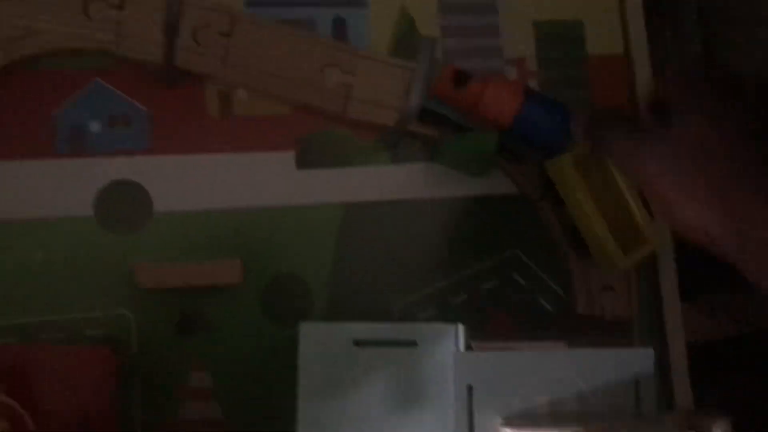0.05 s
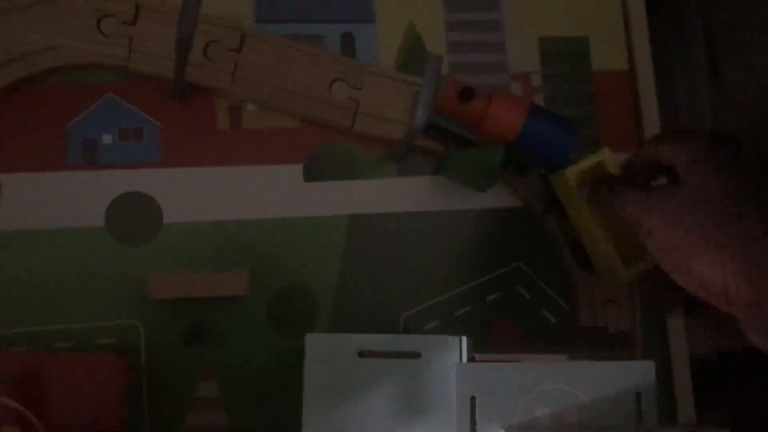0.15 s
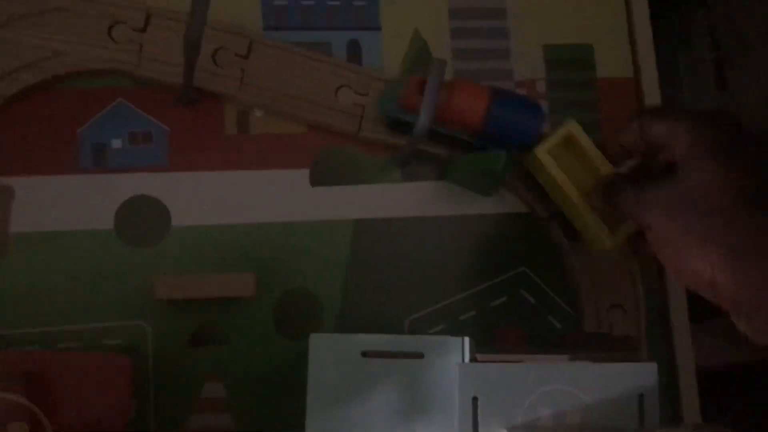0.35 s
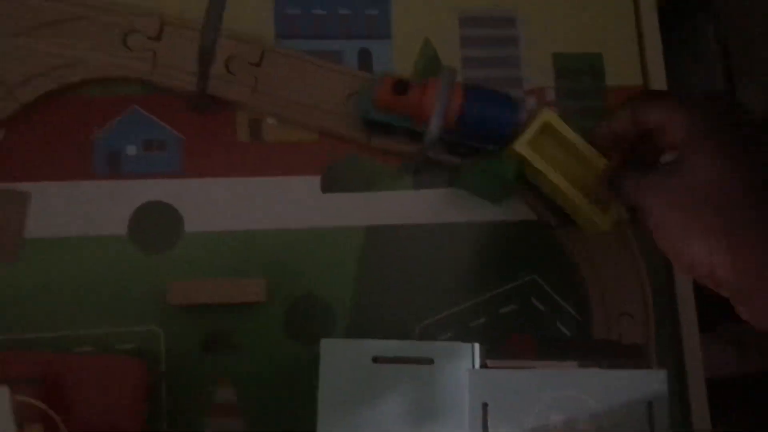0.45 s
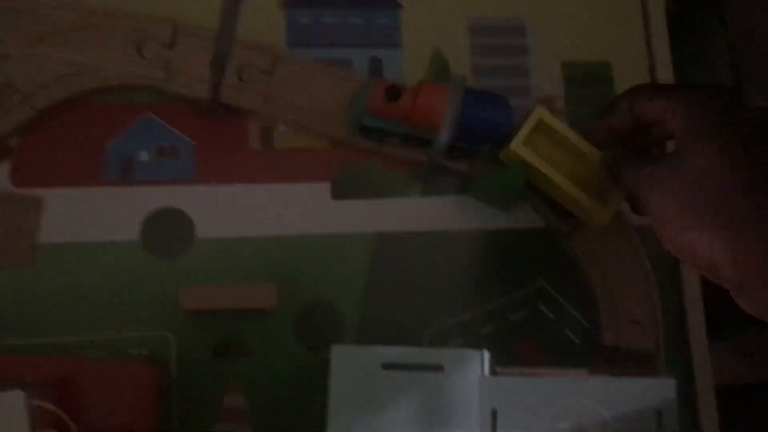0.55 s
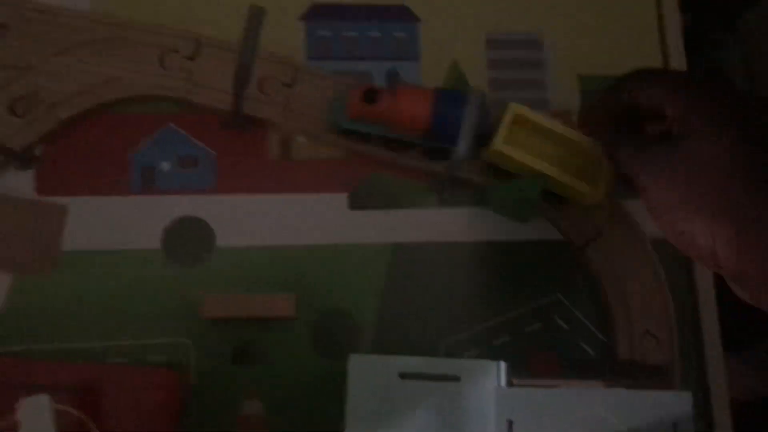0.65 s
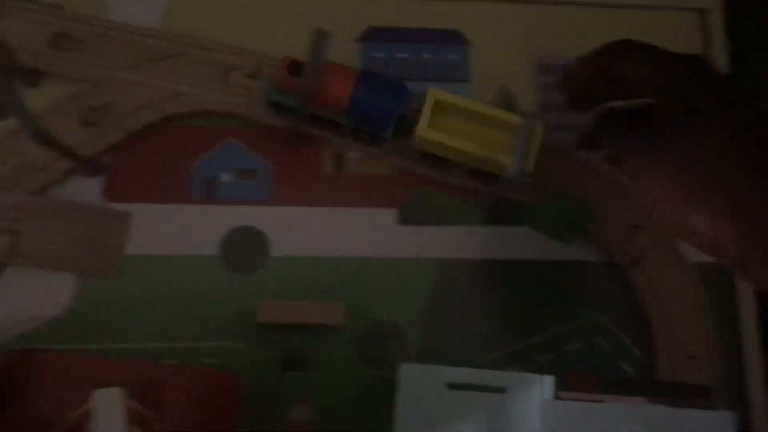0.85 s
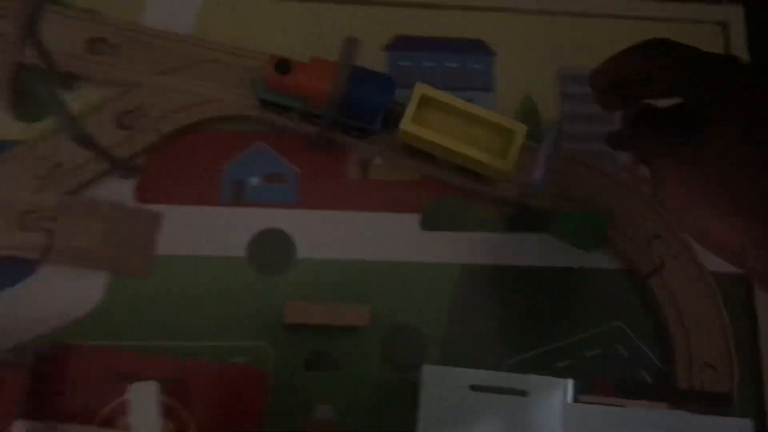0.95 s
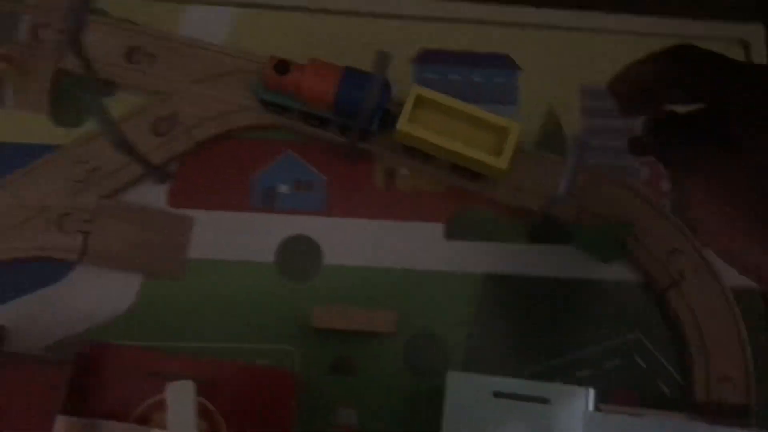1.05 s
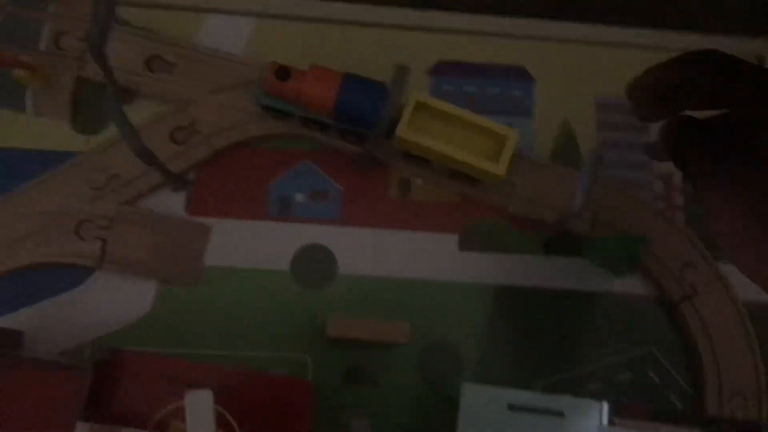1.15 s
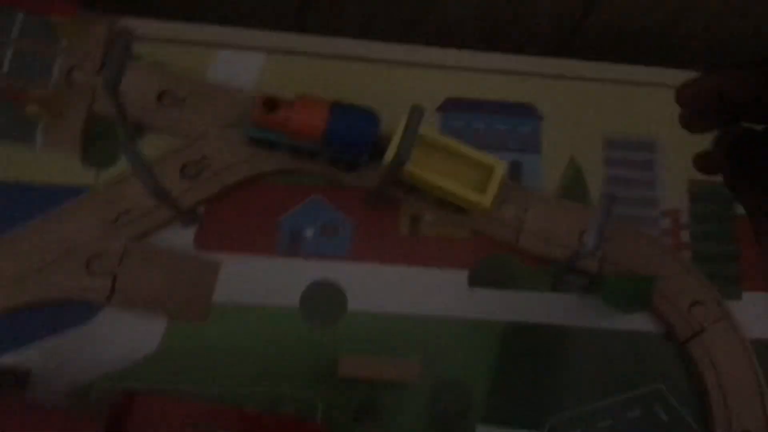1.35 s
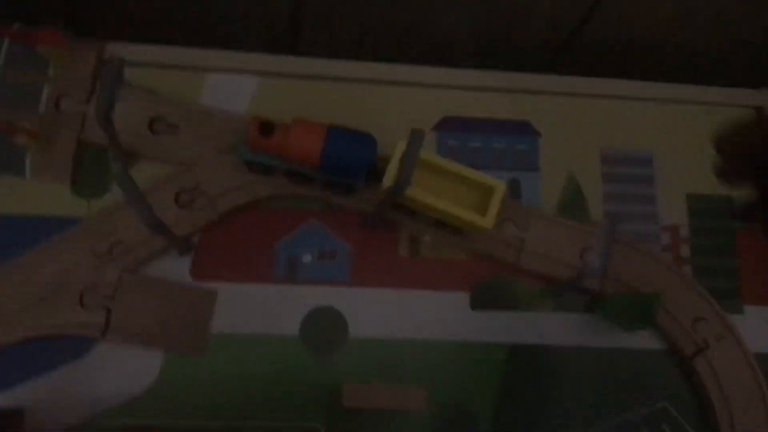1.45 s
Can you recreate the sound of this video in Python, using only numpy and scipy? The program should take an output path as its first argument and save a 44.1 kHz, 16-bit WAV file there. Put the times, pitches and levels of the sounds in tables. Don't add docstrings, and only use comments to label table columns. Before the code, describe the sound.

Toy train pushed over wooden track joints, sharp clicks and knocks above a low hollow table rumble

```python
import sys
import numpy as np
from scipy import signal
from scipy.fft import rfft, irfft
from scipy.io import wavfile
from scipy.ndimage import uniform_filter1d

SR = 44100
rng = np.random.default_rng(int(sys.argv[2]) if len(sys.argv) > 2 else 0)


def attenuation_scalar(level_db):
    decades = np.asarray(level_db, float) / 20
    return 10 ** decades


def persist_wave(psi):
    counts = np.round(np.clip(psi, -1, 1) * 32767).astype(np.int16)
    wavfile.write(sys.argv[1], SR, np.atleast_2d(counts).T)


N = 66150


def level(x, db):
    return x * attenuation_scalar(db) / np.sqrt(np.mean(x ** 2))


def add(out, start_s, x):
    i = int(start_s * SR)
    out[i:i + len(x)] += x[:N - i]


def cut(x, hz, kind, order):
    return signal.sosfilt(signal.butter(order, hz, kind, fs=SR, output="sos"), x)


def ring(modes, chance=0, push=None):
    hz, db, t60_s = np.array(modes, float).T[:, :, None]
    detune, scatter = np.zeros((2, len(modes), 1)) + chance
    t = np.arange(int(min(np.max(t60_s), 0.2) * SR)) / SR
    mode_hz = np.minimum(hz * (1 + 0.037 * detune), 16000)
    waves = np.sin(2 * np.pi * mode_hz * t) * attenuation_scalar(-60 * t / t60_s)
    if push is not None:
        driven = signal.fftconvolve(waves, push[None], axes=1)
        gain = np.sqrt(np.sum(waves ** 2, axis=1) / np.sum(driven ** 2, axis=1))
        rank = np.argsort(np.argsort(hz, axis=0), axis=0)
        waves = driven * gain[:, None] * (-1) ** rank
    return np.sum(attenuation_scalar(db + 2.5 * scatter) * waves, axis=0)


def near(modes, pitch_hz, db_oct, t60_s):
    struck = []
    for hz, db, mode_t60_s in modes:
        octaves = abs(np.log2(hz / pitch_hz))
        if octaves > 0.09:
            struck.append((hz, db - db_oct * octaves, mode_t60_s))
    return struck + [(pitch_hz, 3.5, t60_s)]


def hit(peak_db, modes, chatter_ms, chance):
    t = np.arange(2500) / SR
    chatter = np.exp(-2 * t / (chatter_ms * 1e-3))
    loose_parts = attenuation_scalar(-40) * np.exp(-t / 0.0058)
    push = chance[:2500] * np.minimum(t / 0.00046, 1) * (chatter + loose_parts)
    push[4] += 0.74 * np.sqrt(np.sum(push ** 2))
    spread = chance[2500:2500 + 2 * len(modes)].reshape(2, -1, 1).copy()
    spread[:, -1] = 0
    x = cut(ring(modes, spread, push), min(1.55 * modes[-1][0], 20000), "low", order=2)
    return x * attenuation_scalar(peak_db) / np.max(np.abs(x))


def grains(per_s, spread_db, modes):
    happens, size, side = rng.random((3, N))
    size_db = spread_db * np.minimum(-np.log(1 - size), 3.2)
    bumps = (happens < per_s / SR) * attenuation_scalar(size_db) * np.sign(side - 0.5)
    return level(signal.fftconvolve(bumps, ring(modes))[:N], 0)


def patches(db):
    hold = int(SR / 90)
    rough = np.clip(rng.standard_normal(400), -2, 2)
    return db * uniform_filter1d(np.repeat(rough, hold)[:N], size=hold // 2)


# pitch_hz [Hz], level_db [dB per Hz]
AIR_SPECTRUM = [(26, -38), (45, 2), (109, -9.5), (306, -31), (488, -20.5), (2240, -35.5), (2730, -35.5),
                (3080, -36), (16000, -39.5)]


def air():
    hz = np.arange(N // 2 + 1) * SR / N + 1
    pitch_hz, level_db = np.array(AIR_SPECTRUM).T
    hiss_db = np.interp(np.log(hz), np.log(pitch_hz), level_db)
    hiss = irfft(rfft(rng.standard_normal(N)) * attenuation_scalar(hiss_db), N)
    rub_shape = np.exp(-(np.log(hz / 11000) / 3.6) ** 2)
    rub = irfft(rfft(rng.standard_normal(N)) * rub_shape, N)
    passing = np.exp(-((np.arange(N) / SR - 1.188) / 0.078) ** 2)
    return level(hiss, -59) + level(rub, -60.5) * passing


def room(dry):
    t60_s, tail_db, rise_s = 0.14, -16.5, 0.0054
    t = np.arange(SR // 2) / SR
    tail = rng.standard_normal(len(t)) * attenuation_scalar(-60 * t / t60_s) * np.minimum(t / rise_s, 1)
    tail = cut(tail, [600, 11000], "band", order=1)
    return attenuation_scalar(tail_db) * signal.fftconvolve(dry, tail / np.sqrt(np.sum(tail ** 2)))[:N]


# start_s [s], level_db [dB], pitch_hz [Hz], t60_s [s]
PIN_RINGS = [
    (.8625, -44, 15000, .09),
    (.838, -48, 6700, .05),
    (1.195, -66, 5600, .2),
    (.964, -46, 3150, .04),
]


def pins():
    out = np.zeros(N)
    for start_s, level_db, pitch_hz, t60_s in PIN_RINGS:
        add(out, start_s, ring([(pitch_hz, level_db, t60_s)]))
    return out


# pitch_hz [Hz], level_db [dB], t60_s [s]
COUPLER_MODES = [(3600, -12, .005), (4300, -5, .006), (5200, -2, .006), (6100, 0, .007), (7200, -6, .005),
                 (8500, -2, .006), (9400, -2, .005), (10300, 0, .005), (11300, -1, .005), (12300, -3, .004),
                 (13300, -4, .004), (14400, -2, .004), (15400, -2, .004)]
# start_s [s], rumble_db [dB], grit_db [dB], place_hz [Hz] (mode under the wheels)
ROLL_PATH = [(0.0, -55.5, -71.5, 131), (0.156, -69.5, -82.5, 163), (0.21, -39.5, -49, 178),
             (0.254, -37, -54.5, 180), (0.342, -45, -63.5, 170), (0.37, -38.5, -55.5, 173),
             (0.518, -34.5, -53.5, 166), (0.563, -39, -55.5, 177), (0.642, -30.5, -43.5, 178),
             (0.798, -33.5, -40, 205), (0.826, -29.5, -38, 209), (0.935, -29, -39.5, 184),
             (1.024, -37.5, -59.5, 178), (1.148, -40.5, -60, 165), (1.228, -43, -58, 191),
             (1.284, -35.5, -48, 180), (1.344, -54.5, -68, 189), (1.5, -63, -68, 152)]


def axles():
    start_s, _, grit_db, _ = np.array(ROLL_PATH).T
    db = -54.5 + 0.89 * (np.interp(np.arange(N) / SR, start_s, grit_db) + 40)
    chatter = cut(grains(1800, 4.3, COUPLER_MODES), 6600, "low", order=1)
    return chatter * attenuation_scalar(db + patches(4.8))


# pitch_hz [Hz], level_db [dB], t60_s [s]
WOOD_MODES = [(560, -10, .02), (820, -12, .015), (1100, -9, .012), (1400, -6, .01), (1700, -4, .01),
              (2150, -4, .009), (2600, -5, .008), (3100, -6, .008), (3800, -7, .007), (4400, -7, .008),
              (5400, -14, .006), (6500, -17, .005)]
# pitch_hz [Hz], level_db [dB], t60_s [s]
TABLE_MODES = [(68.6, -3, 0.19), (123, -21.5, 0.32), (138.5, -0.5, 0.18), (178, 0.5, 0.12),
               (199.7, -5.5, 0.088), (245.2, -1.5, 0.05), (276.3, -9, 0.076), (316, -7.5, 0.089),
               (389, -16.5, 0.12), (571, 7.5, 0.0043)]


def rolling():
    start_s, rumble_db, grit_db, place_hz = np.array(ROLL_PATH).T
    t = np.arange(N) / SR
    here_hz = np.interp(t, start_s, place_hz)
    rumble, grit = np.zeros(N), np.zeros(N)
    for mode in TABLE_MODES:
        mode_db = mode[1] - 9.5 * abs(np.log2(mode[0] / here_hz))
        rumble += grains(600, 2, [mode]) * attenuation_scalar(mode_db)
    for mode in WOOD_MODES:
        scratch = cut(grains(900, 4.5, [mode]), 0.81 * mode[0], "low", order=2)
        grit += scratch * attenuation_scalar(mode[1] + patches(4))
    grit = level(cut(grit, 5000, "low", order=1) * attenuation_scalar(patches(3)), 0)
    rumble = cut(rumble, 1160, "low", order=2) * attenuation_scalar(np.interp(t, start_s, rumble_db) - 5.5)
    return rumble + grit * attenuation_scalar(np.interp(t, start_s, grit_db))


# start_s [s], level_db [dB], pitch_hz [Hz], chatter_ms [ms]
CLICK_EVENTS = [(0.069,-47.5,3970,2.8), (0.2007,-36,5000,3.4), (.2008,-41,11600,2.3),
                (0.2051,-24.5,10200,2.6), (0.2064,-19.5,5560,5.9), (0.2094,-8.5,11000,0.7),
                (0.209,-17.5,5920,2.4), (.398,-57,14000,1), (0.4,-47,6070,3.2), (.430,-37,8260,7.8),
                (0.437,-20,8140,18), (0.4438,-24,5530,3.4), (0.4444,-24.5,9020,1.9),
                (0.4462,-14.5,8750,4.4), (0.468,-37,8400,2), (0.489,-40,7740,6), (0.558,-53,4630,2.3),
                (0.605,-45,7100,2.7), (0.623,-39,4580,11), (0.6459,-32,4514,4), (.669,-46,5000,8),
                (0.686,-37,5500,1.8), (0.7153,-22,5170,10), (0.741,-26,9040,1.9), (0.7423,-28.5,6600,2.1),
                (0.783,-28,4100,2.9), (0.8174,-19,4500,26), (0.8263,-20.5,8130,10), (.8257,-19,12000,3.9),
                (0.839,-30,10500,6), (0.852,-24,5000,5.9), (0.8545,-32,14100,4), (0.8598,-36,13700,2),
                (0.8619,-18,4130,5.3), (.881,-38,5900,3.9), (.882,-43,11000,2.7), (0.8915,-26.5,14030,1.8),
                (0.8911,-18,9660,2.1), (0.8916,-15.5,4290,8.9), (0.9105,-50,5560,3.6), (0.95,-39,11000,4.6),
                (0.9643,-39.5,6100,6), (1.106,-47,4370,2.7), (1.2335,-48,5470,6), (1.261,-41,7000,4.9),
                (1.2732,-39,13300,1.5), (1.2729,-28.5,8850,7.1), (1.2845,-39,12700,1.8),
                (1.4414,-39,13430,32)]


def clicks():
    out = np.zeros(N)
    for (start_s, level_db, pitch_hz, chatter_ms), chance in zip(CLICK_EVENTS, rng.standard_normal((50, 2540))):
        modes = near(COUPLER_MODES, pitch_hz, db_oct=6, t60_s=0.005)
        add(out, start_s, hit(level_db, modes, chatter_ms, chance))
    return cut(out, 1100, "high", order=2)


# start_s [s], level_db [dB], pitch_hz [Hz] (strongest ring), thump_db [dB] (table)
KNOCK_EVENTS = [(0.1941,-32,1440,-40), (0.2058,-26,2115,-32), (0.2347,-35,1370,-34), (0.32,-49,1410,-47),
                (0.365,-43.5,1460,-53), (0.3779,-42,1680,-31.5), (.400,-30,1390,-41), (.425,-32,1810,-31),
                (.4305,-26,2090,-55), (0.4377,-28,2020,-27.5), (.452,-29.5,3130,-43), (.465,-32.5,1820,-48),
                (.478,-34.5,2570,-31), (0.488,-33.5,1410,-36), (0.497,-39.5,1530,-57), (.5165,-56,1686,-55),
                (0.527,-63,1870,-56), (.5585,-31.5,2010,-53), (0.574,-41.5,1484,-56), (.580,-36.5,1350,-52),
                (.619,-38,1830,-27), (0.625,-33,1820,-43), (0.6468,-32,1900,-43), (0.658,-39,1520,-56),
                (.684,-32.5,1360,-46), (0.7162,-19.5,1523,-18), (0.734,-26.5,1820,-26),
                (0.7809,-23,3240,-26.5), (0.7824,-29.5,1610,-31), (.817,-21.5,2110,-31),
                (0.8257,-21.5,1900,-14.5), (0.8294,-18.5,3020,-24.5), (0.8518,-18.5,2900,-21.5),
                (.862,-21,2240,-40), (0.8803,-17.5,1802,-26), (.892,-11.5,2270,-23), (0.912,-27,1720,-35.5),
                (.963,-29,3220,-36), (1.08,-47,1040,-45), (1.091,-42.5,3297,-43), (1.103,-43,1010,-39),
                (1.174,-44,1210,-29.5), (1.2303,-34,1791,-49), (1.2341,-35.5,1360,-24.5),
                (1.238,-36,1830,-40), (1.250,-45,1320,-48), (1.261,-33,1100,-52), (1.2731,-24,4430,-27),
                (1.2768,-29,2784,-37), (1.281,-31,554,-29), (1.368,-60,1000,-46)]


def knocks():
    push_s, lag_s, thump_t60_s = 0.0017, 0.0013, 0.17
    out = np.zeros(N)
    thump = np.convolve(ring(TABLE_MODES), np.hanning(int(push_s * SR) + 3))
    thump = thump * attenuation_scalar(-60 * np.arange(len(thump)) / SR / thump_t60_s)
    thump = thump / np.max(thump)
    for (start_s, level_db, pitch_hz, thump_db), chance in zip(KNOCK_EVENTS, rng.standard_normal((50, 2540))):
        modes = near(WOOD_MODES, pitch_hz, db_oct=0.5, t60_s=0.014 * min(1, 2400 / pitch_hz))
        add(out, start_s, hit(level_db, modes, 6.65, chance))
        add(out, start_s + lag_s, thump * attenuation_scalar(thump_db))
    return cut(out, 7300, "low", order=2)


def scene():
    train = knocks() + clicks() + pins() + rolling() + axles()
    dry = cut(train, 98, "high", order=2)
    return (dry + room(dry) + air())[None]


def top_cut(x):
    return signal.sosfilt(signal.butter(12, 16980, fs=SR, output="sos"), x)


def record(dry):
    top = signal.sosfilt(signal.ellip(8, 0.3, 50, 15900, fs=SR, output="sos"), dry)
    mix = cut(top, 61, "high", order=2)
    return top_cut(mix)


dry = scene()
out = record(dry)
persist_wave(out)
```